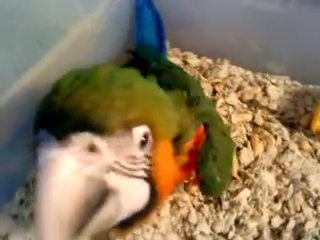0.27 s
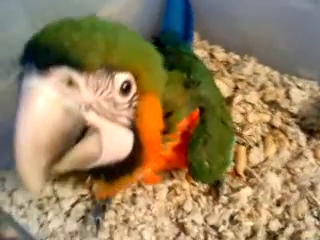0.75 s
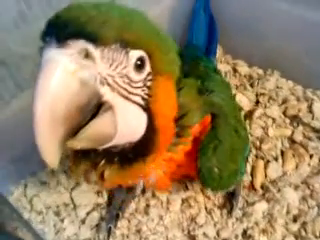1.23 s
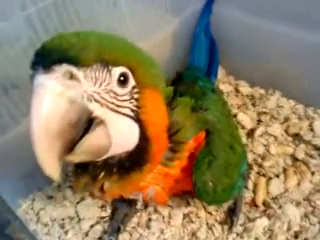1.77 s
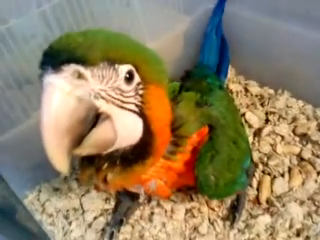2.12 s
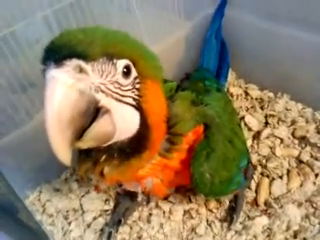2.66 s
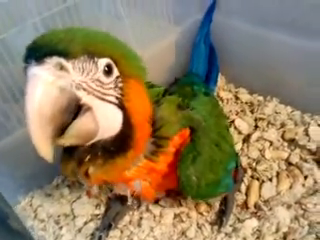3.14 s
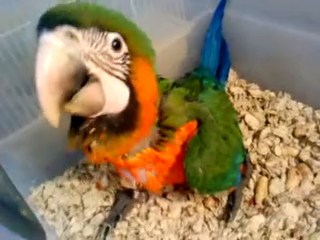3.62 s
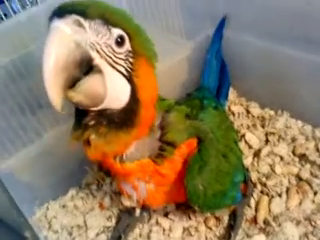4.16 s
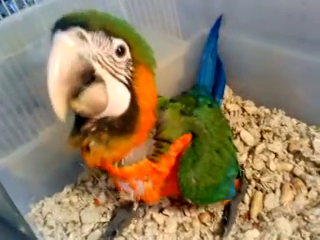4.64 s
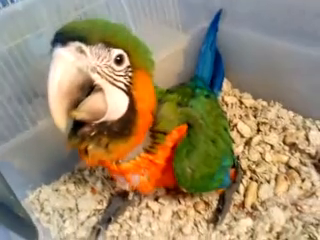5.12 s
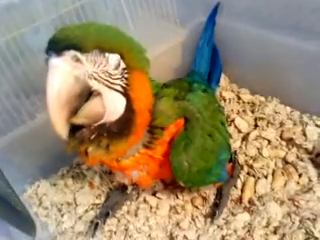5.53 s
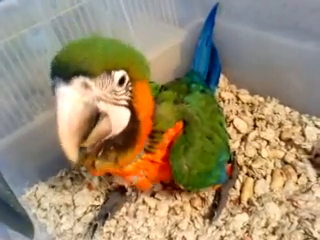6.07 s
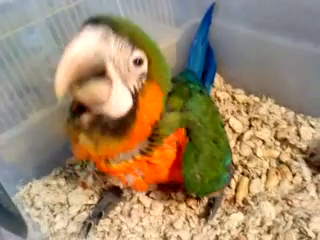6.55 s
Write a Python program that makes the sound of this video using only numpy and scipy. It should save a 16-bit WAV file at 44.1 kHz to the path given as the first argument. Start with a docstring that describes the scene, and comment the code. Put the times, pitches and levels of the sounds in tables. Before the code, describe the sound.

Continuous rapid, scratchy begging from a macaw chick in a plastic tub, breathy rasps and frayed whistles, dipping mid-way before a loud harsh growl.

```python
"""Macaw chick begging in a tub

A macaw chick begs without a pause from a plastic tub, close by in a small room.
Rasping air is noise, chopped unevenly and filtered by a throat; hoarse whistles are sliding, frayed sines.
Two nasal buzzes are stacks of harmonics; two harsh growls are chopped noise through a throat and a chest.
The tub adds short echoes and ringing, the room a diffuse tail; a faint floor and a handling rumble lie below.
"""
import sys
import numpy as np
from scipy import signal
from scipy.fft import rfft, irfft
from scipy.io import wavfile
from scipy.ndimage import uniform_filter1d, map_coordinates

SR = 44100
rng = np.random.default_rng(int(sys.argv[2]) if len(sys.argv) > 2 else 0)


def file_out(sig):
    """Save sig as 16-bit WAV at sys.argv[1]."""
    # one column per channel
    cols = np.atleast_2d(sig).T
    # limit, then scale
    lim = np.clip(cols, -1, 1)
    pcm = np.round(lim * 32767).astype(np.int16)
    wavfile.write(sys.argv[1], SR, pcm)


N = 299439
TIME = np.arange(N) / SR


def gain_of(db):
    """Logarithmic level: decibels become an amplitude factor."""
    return 10 ** (np.asarray(db) / 20)


def evened(x):
    """Normalization: scales a signal to rms 1."""
    return x / np.sqrt(np.mean(abs(x) ** 2) + 1e-20)


def read(points, hz):
    """Logarithmic frequency scale: interpolates a curve along log frequency."""
    point_hz, value = np.transpose(points)
    return np.interp(np.log(hz + 1), np.log(point_hz), value)


def curves(rows, t):
    """Piecewise-linear control: the columns of a table at the times t."""
    s, *columns = np.transpose(rows)
    return [np.interp(t, s, column) for column in columns]


def span(start, end, fade_s=0.011):
    """Windowing: the sample times of one call, and a gain with soft ends."""
    t = np.arange(start, end, 1 / SR)
    to_nearest_end = np.minimum(t - t[0], t[-1] - t)
    return t, np.clip(to_nearest_end / fade_s, 0, 1)


def add(mix, s, sound):
    """Superposition: sums a sound into the mix from s seconds on."""
    part = mix[max(round(s * SR), 0):][:len(sound)]
    part += sound[:len(part)]


def colour(x, points):
    """Linear filtering: multiplies the spectrum by a curve in dB, then scales to rms 1."""
    hz = np.fft.rfftfreq(len(x), 1 / SR)
    return evened(irfft(rfft(x) * gain_of(read(points, hz)), len(x)))


def wander(t, hz):
    """Band-limited random fluctuation: rms 1, changing up to about hz times a second."""
    knots = rng.standard_normal(16384)
    return evened(map_coordinates(knots, [(t - t[0]) * 2 * hz + 2], order=3, mode="wrap"))


def flaps(t, rate_hz, unevenness, depth_db):
    """Amplitude modulation: slack membranes chop the air at an uneven rate."""
    turns = np.cumsum(rate_hz * (1 + unevenness * wander(t, rate_hz))) / SR
    return evened(gain_of(depth_db * np.cos(2 * np.pi * turns)))


# One row a push of rasping air: (loudest at [s], rise [s], fade [s], relative effort [dB],
# brightness: level of the treble [dB], depth: level of the low end [dB])
PUSHES = [ (0.0, .05, 0.035, -22.5, -11, -19), (.13, 0.2, 0.1, -24.5, -2, -14.5),
          (.415, 0.057, 0.078, -24, 4.5, -18.5), (.58, 0.062, 0.17, -21, -10.5, -12.5),
          (.91, 0.098, 0.068, -23.5, -6.5, -18.5), (1.015, 0.058, 0.043, -25.5, -6.5, -13.5),
          (1.255, 0.078, 0.059, -29, -9, -9.5), (1.38, 0.057, 0.1, -24, -0.5, -12.5),
          (1.647, 0.083, 0.074, -26, -4.5, -12.5), (1.905, 0.064, 0.054, -34, -3.5, -5),
          (1.985, 0.058, 0.048, -23, -5.5, -28.5), (2.085, 0.049, 0.14, -18, -5.5, -10),
          (2.27, 0.026, 0.13, -22.5, 5, -11.5), (2.365, 0.089, 0.086, -20, -1.5, -24.5),
          (2.56, 0.093, 0.11, -22, -2.5, -19), (2.7, 0.052, .07, -31, -1.5, -9),
          (2.847, .006, 0.086, -32, -2.5, -9), (2.958, 0.1, 0.05, -31, -2.5, -14),
          (3.07, 0.06, 0.051, -35.5, -18, -6.5), (3.287, .11, 0.12, -29, -18.5, -11.5),
          (3.445, 0.01, 0.021, -40, 3, -7), (3.595, 0.078, 0.047, -23.5, 0.5, -18.5),
          (3.715, 0.03, 0.028, -22.5, 2, -13), (3.845, 0.067, 0.065, -21, 2.5, -19),
          (3.91, 0.033, 0.076, -23, 3.5, -15.5), (4.05, 0.05, 0.17, -14, -11, -7),
          (4.254, 0.043, .1, -11.5, -16, -10), (4.585, 0.097, 0.074, -29, -13, -22),
          (4.675, 0.13, 0.088, -32, -4.5, -12.5), (4.795, 0.026, 0.11, -24, 2, -20),
          (4.87, .05, 0.089, -22.5, -6, -26.5), (4.99, 0.063, 0.28, -26.5, -15.5, -14),
          (5.255, 0.16, 0.08, -30, -0.5, -13.5), (5.354, 0.08, 0.045, -25, -21.5, -11),
          (5.48, 0.12, 0.072, -22, -1, -20.5), (5.565, 0.028, 0.17, -19.5, -6.5, -20),
          (5.73, 0.088, 0.04, -29, -19.5, -12), (5.87, 0.11, 0.066, -21.5, -6.5, -15.5),
          (5.95, 0.055, 0.099, -27, -17, -12.5), (6.13, 0.039, 0.078, -26.5, -16.5, -18),
          (6.215, 0.061, .07, -29.5, -12, -12.5), (6.33, 0.022, .05, -31, -7, -14),
          (6.415, 0.056, 0.18, -29.5, -1.5, -10), (6.62, .045, 0.18, -20.5, -7, -17.5),
          (6.74, 0.1, .05, -20.5, -10.5, -29)]
PUSH_DROP_DB, PUSH_CURVE = 10.5, 1.34  # sinking within one rise or fade time; roundness of the top
IDLE_DB, IDLE_BRIGHTNESS_DB, IDLE_DEPTH_DB = -41.5, -15, -6  # the thin hiss left between pushes


def rasp_controls(t):
    """Power summation: overlapping pushes add, and the strongest weighs most in brightness and depth."""
    s, rise_s, fade_s, db, bright_db, depth_db = np.transpose(PUSHES)[:, :, None]
    away = np.maximum((s - t) / rise_s, (t - s) / fade_s)
    power = gain_of(db - PUSH_DROP_DB * abs(away) ** PUSH_CURVE) ** 2
    idle = gain_of(IDLE_DB) ** 2
    total = power.sum(0) + idle
    effort_db = 10 * np.log10(total)
    mean_bright_db = ((power * bright_db).sum(0) + idle * IDLE_BRIGHTNESS_DB) / total
    mean_depth_db = ((power * depth_db).sum(0) + idle * IDLE_DEPTH_DB) / total
    return effort_db, mean_bright_db, mean_depth_db


# Resonance curve of the throat at its resting colour: (frequency [Hz], relative level [dB])
THROAT_CURVE = [(100, -62.5), (400, -31.5), (700, -20.5), (1000, -17), (1300, -9.5), (1750, -4.5),
                (2150, -1), (2800, 1), (3700, -1), (5100, -4.5), (6700, -8), (7600, -17.5), (8400, -28),
                (9200, -54)]
# How far brightness reaches each frequency: (frequency [Hz], share of the brightness [0-1])
BRIGHTNESS_REACH = [(3500, 0.16), (4600, 0.77), (5600, 1), (6900, 1), (8500, 0.92)]
# How far depth reaches each frequency: (frequency [Hz], share of the depth [0-1])
DEPTH_REACH = [(400, 1), (1400, 0.94), (1800, 0.95), (2400, 0)]
REST_BRIGHTNESS_DB, REST_DEPTH_DB = -6, -12  # where the throat has its resting colour


def rasp():
    """Source and filter: turbulent air through a throat whose narrow resonances come and go."""
    air = rng.standard_normal(N) * flaps(TIME, rate_hz=170, unevenness=0.42, depth_db=1.3)
    hz, t, z = signal.stft(air, SR, nperseg=512, noverlap=384)
    effort_db, bright_db, depth_db = rasp_controls(t)
    throat = gain_of(read(THROAT_CURVE, hz))
    middle = (hz > 2200) & (hz < 4400)
    throat /= np.sqrt(np.mean(throat ** 2 * middle))
    # random patches, 3 bins high and 13 frames long
    patches = uniform_filter1d(rng.standard_normal(z.shape), size=3, axis=0)
    patches = evened(uniform_filter1d(patches, size=13, axis=1))
    # a bright or forced hiss is smooth; a darker, softer rasp rings more
    patchy_db = np.interp(bright_db, [-10, 2], [3.4, 1.9]) * np.interp(effort_db, [-22, -15], [1, .6])
    shape_db = np.outer(read(BRIGHTNESS_REACH, hz), bright_db - REST_BRIGHTNESS_DB)
    shape_db += np.outer(read(DEPTH_REACH, hz), depth_db - REST_DEPTH_DB)
    z = z * throat[:, None] * gain_of(effort_db + shape_db + patchy_db * patches)
    return signal.istft(z, SR, nperseg=512, noverlap=384)[1][:N]


# One row a whistle: (start [s], rise [s], fade [s], pitch when loudest [Hz],
# slide when loudest [octaves/s], relative level [dB], hoarseness [0-1, capped at 1])
WHISTLE_CALLS = [ (0.0, 0.0023, .07, 5400, -1.2, -11, 0.4), (.01, 0.037, .11, 5270, 0, -16.5, .25),
                 (.118, .024, 0.064, 5240, -0.5, -18, 0.3), (.15, 0.037, .2, 5220, -0.5, -34, 0.2),
                 (.265, 0.12, 0.071, 2042, 3.5, -23, 0.63), (.3, 0.089, 0.032, 3860, 2, -25, 0.84),
                 (.37, .15, 0.13, 2039, 0.1, -21, 0.49), (.535, 0.027, 0.042, 3624, -3, -18.5, .78),
                 (0.649, 0.029, 0.069, 6190, -1.5, -26, 1), (0.831, 0.1, 0.032, 2480, -0.5, -25.5, 0.8),
                 (1.122, 0.022, 0.021, 3850, -17, -27, 0.57), (1.14, 0.0088, 0.028, 3015, 0.5, -25, 0.5),
                 (1.218, 0.019, 0.017, 3397, 1, -17, .14), (1.275, 0.042, 0.069, 4000, -2.5, -23.5, 0.64),
                 (1.33, 0.014, 0.055, 3350, -1.5, -15.5, .74), (1.353, 0.044, 0.056, 3983, -1.5, -14, 0.57),
                 (1.549, 0.03, 0.031, 2405, 6.5, -26, 0.7), (1.545, 0.026, .03, 6500, 1.8, -27.5, 0.84),
                 (1.745, 0.009, 0.072, 3630, 1, -28, 0.53), (1.742, 0.011, 0.015, 4590, 2, -28.5, 0.4),
                 (1.277, .02, .03, 5430, 1, -33, 0.5), (1.83, 0.051, 0.064, 3260, -1.5, -25, 0.77),
                 (1.945, .023, .03, 2320, 2, -34, 0.1), (1.98, 0.035, .05, 3670, 1, -25, .58),
                 (2.011, .02, .025, 5770, -2.5, -24, .4), (2.05, 0.026, 0.026, 3960, 2.5, -18, 0.36),
                 (2.062, 0.027, 0.099, 5915, -.5, -13.5, 0.52),
                 (2.151, 0.029, 0.087, 5830, -0.3, -20.5, 0.5), (2.062, .018, 0.066, 2946, -1, -17, .38),
                 (2.114, 0.038, .022, 4900, 1.8, -16, 0.2), (2.26, 0.084, .13, 2817, 2.3, -18.5, 0.87),
                 (2.317, 0.026, 0.037, 4950, -1, -14, 0.54), (2.481, 0.014, 0.055, 4860, -0.5, -24, .8),
                 (2.5, 0.097, 0.073, 2726, -2, -20, 0.75), (2.565, 0.049, 0.052, 5250, 0.7, -17.5, .5),
                 (2.92, .04, 0.15, 1490, -3.5, -42, .25), (3.02, 0.054, .16, 1006, -2, -43.5, .3),
                 (3.221, 0.024, 0.53, 4000, -1, -39, 0.75), (3.785, 0.051, 0.11, 3420, -0.2, -18, 0.74),
                 (3.983, 0.017, .03, 4570, -3.5, -16.5, 0.45), (4.11, .035, 0.056, 3820, -.5, -19, 0.5),
                 (4.466, .018, .015, 4220, -4, -29, .45), (4.485, .012, 0.052, 3570, -1, -28, 0.57),
                 (4.546, 0.023, 0.018, 1826, -0.5, -32.5, 0.7), (4.791, .065, 0.013, 4410, -1.5, -16, 0.64),
                 (4.806, 0.028, 0.046, 3920, 1, -14, 0.6), (4.849, .025, 0.055, 3006, -0.9, -15, 0.25),
                 (4.891, 0.072, 0.057, 2900, 1, -23, 0.66), (5.027, .023, 0.023, 2127, -1, -24, 0.62),
                 (5.045, 0.051, 0.073, 4900, -4, -20.5, 0.85),
                 (5.14, 0.024, 0.044, 2226, -1.5, -29.5, 0.48), (5.188, .018, 0.033, 3160, 1.5, -21.5, .15),
                 (5.221, 0.033, 0.047, 3880, -0.5, -20.5, .55), (5.23, 0.085, .1, 2727, -0.2, -25.5, 0.91),
                 (5.361, .105, .05, 4184, 3.5, -21, 0.92), (5.38, 0.092, 0.033, 2165, 4.5, -21.5, 0.8),
                 (5.502, 0.016, 0.025, 3130, 0.5, -18, 0.54), (5.549, 0.041, 0.065, 3040, 0, -16, 0.46),
                 (5.553, .017, 0.045, 5070, -1.5, -16, 1.12), (5.67, 0.053, 0.033, 2850, -3.5, -26, 0.55),
                 (5.755, 0.074, 0.093, 3610, -2, -14, 0.69), (5.862, .021, .03, 2960, -2, -10, 0.4),
                 (5.89, .03, 0.054, 3500, -1, -21, 0.67), (5.904, .017, .015, 2996, 0, -17.5, .05),
                 (6.017, 0.012, 0.015, 3820, -4, -25, 0.2), (6.068, 0.013, .02, 1750, 0, -32, 0.27),
                 (6.184, .013, 0.023, 2260, -3.5, -24, 0.15), (6.37, 0.16, 0.066, 1897, 3.5, -26.5, 0.62),
                 (6.53, .1, .09, 2010, 0, -27, 0.49), (6.39, 0.1, 0.14, 3570, 3, -26.5, 0.43),
                 (6.54, .03, 0.035, 4200, -2, -21.5, 0.98), (6.565, 0.063, .03, 3850, 0.2, -10, 0.71),
                 (6.565, 0.036, 0.056, 3267, 2.5, -13.5, 0.4), (6.63, .015, 0.12, 3040, 0.5, -15.5, .37),
                 (6.672, 0.043, 0.13, 4535, -.7, -19, 0.77)]
WHISTLE_EDGE_DB, WHISTLE_CURVE = -16.5, 1.11  # fall towards a whistle's two ends; roundness of the top
SLIDE_S = .11  # a slide levels off about this far from the loudest moment


def whistle(start, rise_s, fade_s, pitch_hz, slide, level_db, hoarse,
            stutter_hz=115, stutter_db=6, scatter_hz=330, jitter_hz=220, overtone_db=-19, fray=.9,
            quaver_hz=30, quaver_db=2, quaver_octaves=0.0059):
    """Frequency modulation: a squeal of the syrinx slides and quavers; hoarseness stutters and frays it."""
    t, window = span(start, start + rise_s + fade_s)
    since_top = t - start - rise_s
    away = abs(np.maximum(-since_top / rise_s, since_top / fade_s))
    db = level_db + WHISTLE_EDGE_DB * away ** WHISTLE_CURVE
    hoarse = np.clip(hoarse, 0, 1)
    octaves = slide * SLIDE_S * np.tanh(since_top / SLIDE_S) + quaver_octaves * wander(t, quaver_hz)
    hz = pitch_hz * 2 ** octaves
    scatter = scatter_hz * hoarse ** 3 * wander(t, jitter_hz)
    phase = 2 * np.pi * np.cumsum(hz + scatter) / SR
    # the membrane slips in and out of step, which breaks the tone into a narrow ragged band
    phase += fray * hoarse * wander(t, stutter_hz)
    stutter = flaps(t, stutter_hz, unevenness=0.502, depth_db=stutter_db * np.sqrt(hoarse))
    stutter = evened(stutter * gain_of(quaver_db * wander(t, quaver_hz)))
    # the throat weighs the octave overtone against the fundamental
    overtone = gain_of(overtone_db + read(THROAT_CURVE, 2 * hz) - read(THROAT_CURVE, hz))
    tone = evened(np.sin(phase) + overtone * np.sin(2 * phase))
    return start, gain_of(db) * window * stutter * tone


def stray_squeaks(count=130, rise_s=.022, fade_s=.045, below_db=-1, spread_db=8, slide=3.5,
                  low_hz=1800, high_hz=5200, hoarse=.5):
    """Random excitation: rows for small whistles inside the rasp that follow its effort and colour."""
    for when, pitch, glide, size in rng.random((count, 4)):
        s = when * (N / SR - rise_s - fade_s)
        hz = low_hz * (high_hz / low_hz) ** pitch
        effort_db, bright_db, _ = np.ravel(rasp_controls(s + rise_s))
        extra_db = bright_db - REST_BRIGHTNESS_DB
        colour_db = read(THROAT_CURVE, hz) + read(BRIGHTNESS_REACH, hz) * extra_db
        db = effort_db + colour_db + below_db + spread_db * (size - .5) - .5 * max(extra_db, 0)
        yield s, rise_s, fade_s, hz, slide * (2 * glide - 1), db, hoarse


# Spectrum of the still room: (frequency [Hz], relative level [dB])
FLOOR_SPECTRUM = [(12, -42.5), (20, -1.5), (54, -1), (143, -1.5), (189, -8), (232, 0), (290, -5), (344, 0),
                  (615, -8), (944, -8.5), (1200, -3.5), (1560, -48), (2640, -120)]


def still_room(level_db=-49.5):
    """Stationary background noise: Gaussian noise shaped by a fixed low spectrum."""
    return gain_of(level_db) * colour(rng.standard_normal(N), FLOOR_SPECTRUM)


# Course of the handling noise: (time [s], level [dB])
HANDLING_LEVEL = [(0, -63.5), (1.5, -58), (2.6, -61), (3.1, -51), (3.75, -55), (4.1, -64), (6.2, -54.5),
                  (6.79, -61)]
# Spectrum of the handling noise: (frequency [Hz], relative level [dB])
HANDLING_SPECTRUM = [(15, -8), (40, 4), (90, -11.5), (150, -5.5), (400, -24), (900, -56.5)]


def handling_rumble():
    """Structure-borne noise: a hand's handling, as low-frequency noise that swells and sinks."""
    level_db = curves(HANDLING_LEVEL, TIME)[0]
    return gain_of(level_db) * colour(rng.standard_normal(N), HANDLING_SPECTRUM)


# One inner table a buzz: (time [s], pitch [Hz], relative level [dB], pitch jitter [share of the pitch])
BUZZ_CALLS = [
    [(.53, 376, -36, 0.021), (.57, 387, -31.5, .02), (.62, 420.6, -33, 0.016), (.66, 376.7, -30.5, 0.036),
     (.69, 426.6, -32.5, 0.032), (.725, 430.6, -28.5, 0.028), (.745, 402, -30, .03)],
    [(.895, 411, -31.5, 0.013), (.92, 514, -20.5, .01), (.95, 496.3, -19.5, 0.0095),
     (.975, 517, -13, 0.0065), (.997, 529.5, -19, 0.0054), (1.011, 518.6, -15, 0.019),
     (1.03, 404, -30, .025)],
]
# Resonance curve of the throat in a buzz: (frequency [Hz], relative level [dB])
BUZZ_CURVE = [(250, -8), (400, 2.5), (520, -9), (800, -4), (1050, -22.5), (1550, -14.5), (2050, -1.5),
              (2600, -1.5), (4100, -6), (5200, -5), (6200, -15.5), (7200, -22), (9000, -47)]


def buzz(rows):
    """Harmonic series: membranes locked into regular pulses give 20 partials, weighed by the throat."""
    t, window = span(rows[0][0], rows[-1][0])
    hz, db, jitter = curves(rows, t)
    phase = 2 * np.pi * np.cumsum(hz * (1 + jitter * wander(t, hz=210))) / SR
    stack = 0
    for k in range(1, 21):
        stack = stack + gain_of(read(BUZZ_CURVE, k * hz)) * np.cos(k * phase + 2 * np.pi * rng.random())
    return t[0], gain_of(db) * window * evened(stack)


# One row a growl: (start [s], rise [s], hold [s], fade [s], relative level [dB],
# factor on the throat's frequencies [1], chest against throat at the end of the rise [dB])
GROWL_CALLS = [(1.979, 0.13, 0.097, 0.12, -20.5, 1.085, -22), (3.93, 0.096, .25, 0.16, -18.5, 0.99, -27)]
# Resonance curve of the wide-open throat: (frequency [Hz], relative level [dB])
GROWL_CURVE = [(150, -61), (330, -56.5), (480, -16.5), (650, -3.5), (900, 7.5), (1200, 11.5), (1500, -2),
               (1900, 8.5), (2350, -19.5), (3000, -9.5), (3900, 6), (4800, -5), (8000, -53.5)]
# Resonance curve of the chest: (frequency [Hz], relative level [dB])
CHEST_CURVE = [(130, -32.5), (270, -11), (400, 2), (520, -2), (900, -41)]
GROWL_EDGE_DB, GROWL_SAG_DB = -22, -4  # relative level at a growl's ends and at the end of its hold
CHEST_FADE_DB_PER_S = 48  # the chest sounds mostly at the start


def growl(start, rise_s, hold_s, fade_s, level_db, size, chest_db):
    """Chaotic vibration: flapping membranes excite the wide-open throat and the chest together."""
    corners = start + np.cumsum([0, rise_s, hold_s, fade_s])
    t, window = span(start, corners[-1])
    db = level_db + np.interp(t, corners, [GROWL_EDGE_DB, 0, GROWL_SAG_DB, GROWL_EDGE_DB])
    air = rng.standard_normal(N)[:len(t)] * flaps(t, rate_hz=150, unevenness=0.28, depth_db=0.5)
    throat = colour(air, [(hz * size, peak_db) for hz, peak_db in GROWL_CURVE])
    chest_fall_db = CHEST_FADE_DB_PER_S * (t - corners[1])
    chest = gain_of(chest_db - chest_fall_db) * colour(air, CHEST_CURVE)
    return start, gain_of(db) * window * (throat + chest)


# Reflections from the tub's nearest walls and floor: (delay [s], level against the direct sound [dB])
TUB_ECHOES = [(.00134, -26.5), (.00152, -40.5), (.0019, -29)]
# Resonances of the tub's air and walls: (frequency [Hz], bandwidth [Hz], level [dB])
TUB_MODES = [(916, 10, -2.5), (1090, 5, 1), (1230, 11, -10), (1353, 30, -1.5), (1770, 9.2, -18),
             (1930, 7.4, -26.5), (3090, 35, -12), (3496, 45, -2.5), (3960, 14, -22)]


def tub(x):
    """Reflection and resonance: the plastic walls return quick echoes and ring at a few pitches."""
    t = np.arange(SR // 10) / SR
    taps = np.zeros(len(t))
    taps[0] = 1  # the direct sound
    for delay_s, db in TUB_ECHOES:
        taps[round(delay_s * SR)] += gain_of(db)
    for hz, width, db in TUB_MODES:
        ring = np.exp(-np.pi * width * t) * np.cos(2 * np.pi * hz * t)
        taps += gain_of(db) * 2 * np.pi * width / SR * ring
    return signal.oaconvolve(x, taps / np.linalg.norm(taps))[:N]


# Reverberation time of the room: (frequency [Hz], time to fall by 60 dB [s])
ROOM_DECAY = [(400, 0.29), (2000, 0.24), (5000, 0.22), (9000, 0.13)]


def room(x, onset_s=0.0046):
    """Diffuse reverberation: a noise tail in which each band decays at its own speed."""
    hz, t, z = signal.stft(rng.standard_normal(SR), SR, nperseg=256)
    decay_db = -60 * t / read(ROOM_DECAY, hz)[:, None]
    z = z * gain_of(decay_db) * np.minimum(t / onset_s, 1)
    tail = signal.istft(z, SR)[1]
    return signal.oaconvolve(x, tail / np.linalg.norm(tail))[:N]


def scene():
    """Superposition: the chick's four kinds of sound in tub and room, over the background noises."""
    chick = gain_of(-2.0) * rasp()
    for rows in BUZZ_CALLS:
        add(chick, *buzz(rows))
    for row in GROWL_CALLS:
        add(chick, *growl(*row))
    for row in [*stray_squeaks(), *WHISTLE_CALLS]:
        add(chick, *whistle(*row))
    near = tub(chick)
    floor = still_room()
    handling = handling_rumble()
    return (near + gain_of(-7.0) * room(near) + floor + handling)[None]


def record(dry, threshold_db=-20, squeeze=0.46, recovery_db_per_s=30, edge_hz=9050):
    """Dynamic compression: gain control holds loud squawks down and recovers slowly; then a low-pass."""
    power_db = 10 * np.log10(abs(uniform_filter1d(dry[0] ** 2, size=400)) + 1e-12)
    fall_db = TIME * recovery_db_per_s
    # a peak follower that sinks at the recovery rate
    peak_db = np.maximum.accumulate(power_db + fall_db) - fall_db
    over_db = np.maximum(peak_db - threshold_db, 0)
    held = dry / gain_of(squeeze * uniform_filter1d(over_db, size=200))
    low_pass = signal.firwin(401, edge_hz, window=("kaiser", 8), fs=SR)
    return signal.oaconvolve(held, low_pass[None], "same")


dry = scene()
out = record(dry)
file_out(out)
```